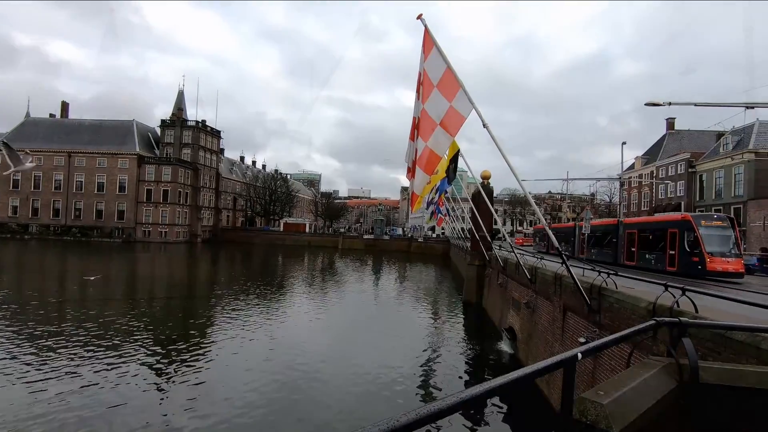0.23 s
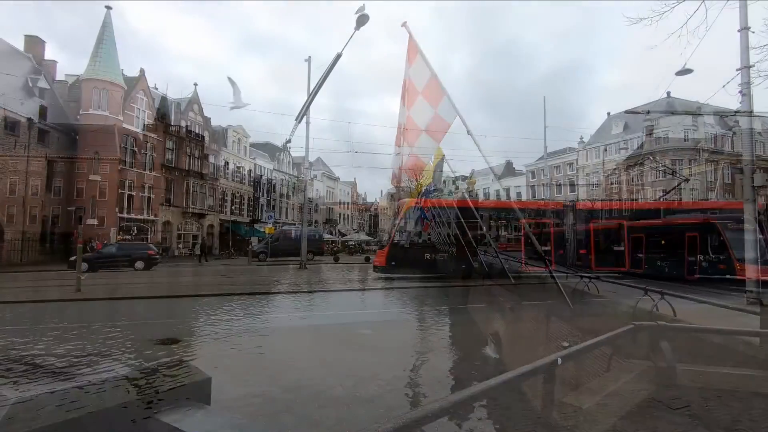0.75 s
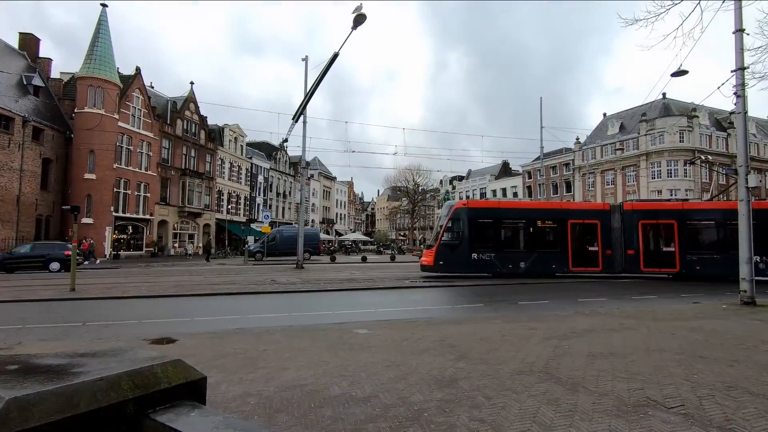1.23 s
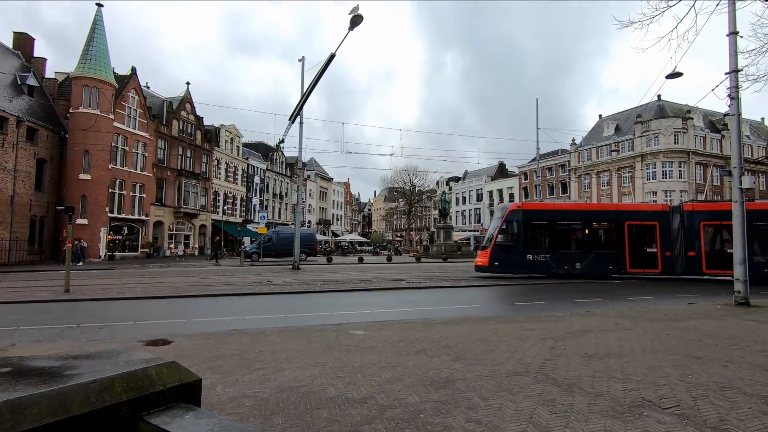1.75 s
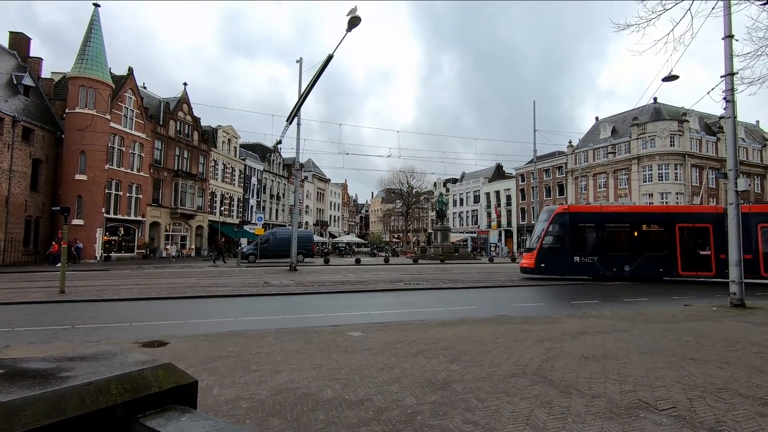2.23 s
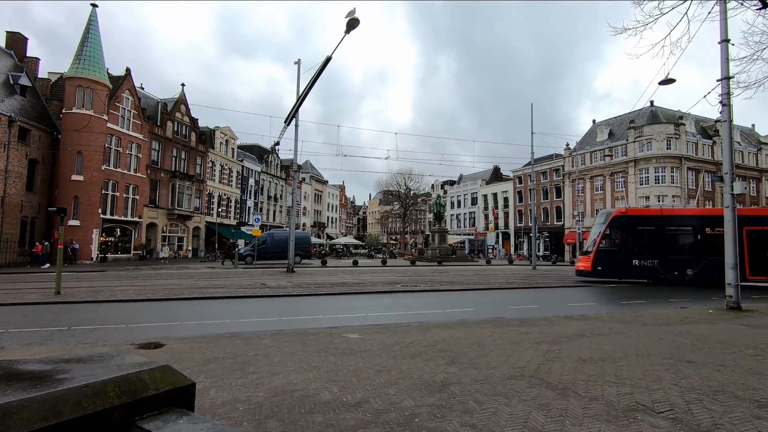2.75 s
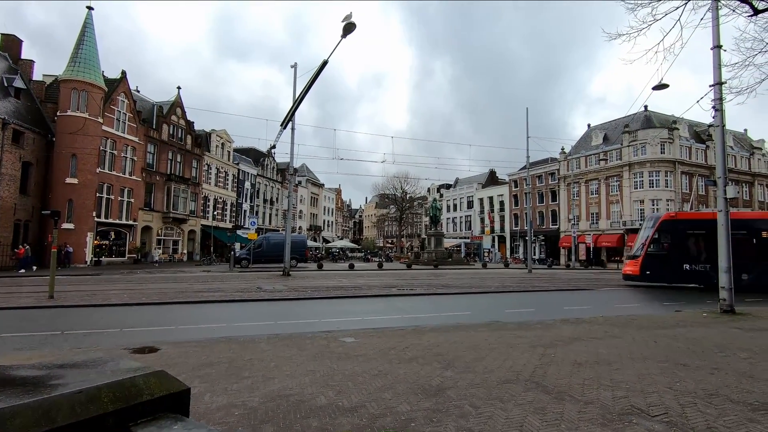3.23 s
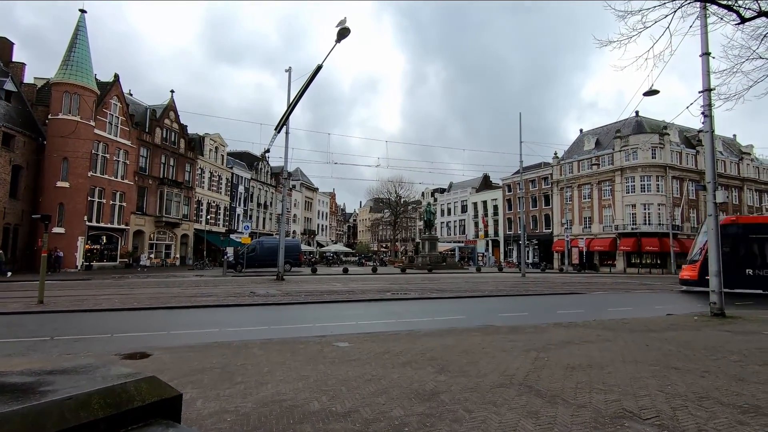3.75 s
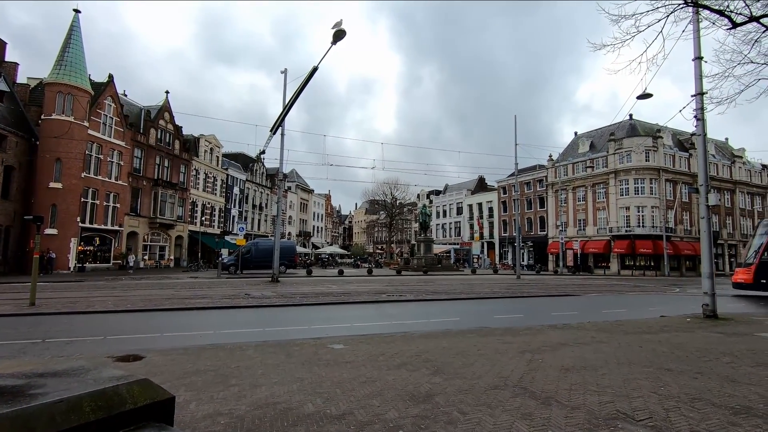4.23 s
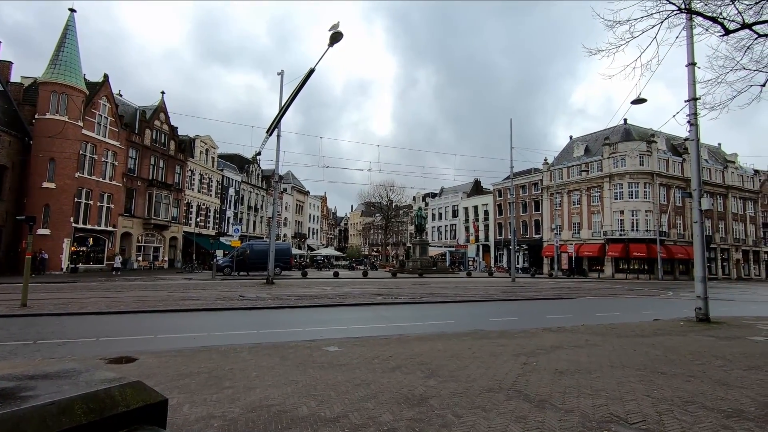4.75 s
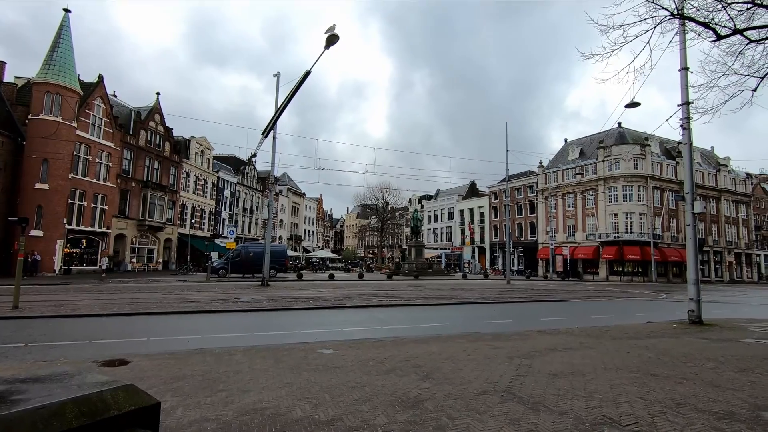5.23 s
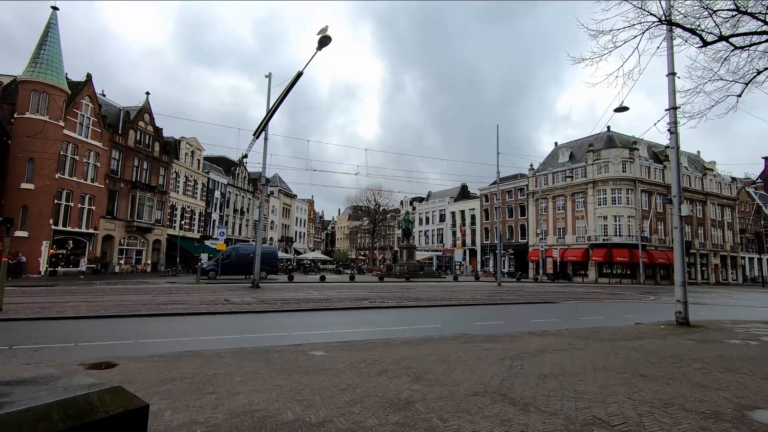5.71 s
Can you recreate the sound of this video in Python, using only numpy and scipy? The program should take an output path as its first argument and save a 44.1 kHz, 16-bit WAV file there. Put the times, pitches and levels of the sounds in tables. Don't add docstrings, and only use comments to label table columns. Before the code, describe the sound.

For the first half second, a distant traffic and tram murmur lies across a pond, bass in the centre and soft hiss spread wide, with a faint thin whine leaning right and a tiny chirp. From 0.5 to 1.2 s it dissolves into a windy square. Low gusts thump the microphone, strongest around 1.3, 1.6 and 2.9 s, over a tram's deep ground rumble, rough wheel roar and mid-pitched metal ringing. Light scrapes come at 0.7 to 1.0 s, then short squeals from 1.0 to 1.6 s. A faint, fluttering motor whine holds one pitch. Small knocks occur near 0.8, 2.7, 3.0 and 3.9 s; wheel edges rub at 2.1, 3.3, 5.0, most clearly 5.35, and 5.8 s. The rolling gradually weakens after 3.5 s, though jolts and rumble persist with thin traffic hiss. Nearly mono sound opens out between 3.4 and 4.8 s.

```python
import sys
import numpy as np
from scipy import signal
from scipy.fft import rfft, irfft, next_fast_len
from scipy.io import wavfile
from scipy.ndimage import uniform_filter1d

SR = 44100
rng = np.random.default_rng(int(sys.argv[2]) if len(sys.argv) > 2 else 0)


def undo_db(level):
    steps = np.asarray(level, float) / 20
    return 10 ** steps


def to_wav(sig):
    pcm = np.clip(np.atleast_2d(sig), -1, 1) * 32767
    pcm = np.round(pcm).astype(np.int16)
    wavfile.write(sys.argv[1], SR, pcm.T)


N = 263718
T = np.arange(N) / SR

# start_s, level_db
NEARNESS = [(.5, -7.5), (.75, -3.5), (1.0, -2), (1.3, 1), (1.75, -0.5), (2.1, -1.5), (2.4, -1.5),
            (2.9, -0.5), (3.15, -.5), (3.5, 1), (3.85, -3.5), (4.15, -0.5), (4.5, -4), (4.8, -2),
            (5.25, -4.5), (5.55, -6.5), (5.98, -7)]
# start_s, jolt_db, length_s
JOLTS = [(1.02, 7, 0.09), (1.17, 2, 0.034), (1.86, 5.5, 0.03), (2.11, 5, 0.08), (2.28, 0, .04),
         (2.55, 4, 0.088), (2.73, 2, 0.017), (2.94, 2.5, .07), (3.29, 3.5, 0.098), (3.74, 2.5, 0.065),
         (4.12, -0.5, 0.056), (4.77, 2, .1), (5.02, 5, .03), (5.35, 5.5, .03), (5.87, 6, 0.15)]
# pitch_hz, level_db (per Hz)
WHEEL_TONE = [(130, -20), (225, -11.5), (258, -5.5), (302, 1.5), (371, 0.5), (504, -8.5), (864, -9),
              (1000, -23.5), (1080, -18.5), (1400, -47.5), (2380, -120)]
# pitch_hz, level_db (per Hz)
RING_TONE = [(560, -24), (950, 1), (1010, -5.5), (1080, -3), (1260, -3.5), (1360, -7.5), (1530, -7),
             (1640, -9), (1740, -3), (1780, -9.5), (1980, -5.5), (2170, -22), (2250, -18.5), (2920, -43.5),
             (4950, -120)]
# pitch_hz, width_hz, level_db (over the ring)
RIMS = [
    (1927, 70, -11.5),
    (2060, 90, -10),
]
# pitch_hz, level_db (per Hz)
GROUND_TONE = [(32, -37), (55, -5.5), (75, -3), (100, 0), (143, 1.5), (158, -6), (178, -3.5), (200, -10.5),
               (240, -14), (260, -23), (340, -40.5), (570, -120)]
# start_s, level_db
WHINE_LOAD = [(.8, -63.5), (.95, -63), (1.18, -46), (1.4, -55), (1.5, -46), (1.81, -70), (2.44, -51.5),
              (2.6, -62), (3.04, -52), (3.17, -62), (3.25, -49), (3.8, -64.5), (4.399, -58.5), (4.9, -62),
              (5.2, -53), (5.39, -57), (5.65, -52), (5.98, -61)]
# start_s, pitch_hz, level_db, octave_db
FAR_WHINE = [(0, 1767, -54, -68), (.03, 1755, -43.5, -67), (.07, 1720, -44, -66), (.095, 1736, -58, -68),
             (.24, 1703, -55, -55), (.29, 1728, -48, -63), (.36, 1716, -60, -59), (.53, 1728, -56, -63),
             (.7, 1710, -69, -70)]
# start_s, level_db, pitch_hz, width_hz, fall_s
KNOCKS = [
    (.823, -37.5, 805, 500, 0.017),
    (2.683, -43, 2660, 500, 0.0063),
    (2.684, -45.5, 4970, 3970, 0.0092),
    (2.69, -46, 3400, 600, 0.0087),
    (3.043, -38, 890, 515, .022),
    (3.92, -40.5, 800, 500, 0.014),
]
# start_s, level_db, pitch_hz, width_hz, fall_s
SQUEALS = [
    (.075, -43, 1040, 50, .021),
    (.901, -57.5, 5960, 300, .025),
    (1.0, -42.5, 2060, 60, .025),
    (1.11, -39.5, 2100, 60, .05),
    (1.12, -48.5, 3150, 400, .04),
    (1.28, -39, 2060, 111, .025),
    (1.41, -43.5, 2110, 60, .019),
    (1.535, -40.5, 2054, 50, .03),
    (1.59, -55, 3020, 200, .02),
    (4.2, -50, 2100, 59.6, .04),
]
# start_s, level_db, pitch_hz, width_hz, fall_s
SCRAPES = [
    (.73, -53, 1350, 300, .027),
    (.77, -41, 1310, 497, .013),
    (.796, -43, 1400, 300, .013),
    (.88, -57, 1500, 300, .017),
    (1.02, -45.5, 1320, 303, .039),
]
# start_s, level_db, pitch_hz, width_hz, fall_s
RUBS = [
    (2.071, -45.5, 1500, 1490, 0.027),
    (3.279, -45, 1650, 303, .07),
    (5.018, -46.5, 1510, 1500, 0.034),
    (5.345, -37.5, 1170, 280, 0.031),
    (5.36, -49, 2000, 300, 0.051),
    (5.8, -48.5, 2020, 2520, 0.11),
]
# pitch_hz, level_db (per Hz)
WIND_TONE = [(8.8, -32.5), (15, -11), (37, 1), (75, -6), (98, -25.5), (160, -120)]
# start_s (middle), swell_db, length_s
GUSTS = [(.98, 6.2, 0.11), (1.3, 10, 0.089), (1.6, 8, 0.065), (1.95, 3.8, 0.11), (2.3, 5, 0.32),
         (2.86, 11, 0.055), (3.25, 4.6, 0.11), (3.46, 7.9, 0.025), (3.79, 6.6, 0.064), (4.3, 2.8, .2),
         (5.14, 7.2, 0.054), (5.85, 5.4, 0.13)]
# pitch_hz, level_db (per Hz)
HISS_TONE = [(1900, -29), (2150, -13.5), (3430, -17), (3840, -21.5), (5000, -23.5), (6500, -29),
             (8500, -33.5), (11200, -53)]
# start_s, level_db
STREET = [(.5, -0.5), (1.0, -1), (1.6, 1), (2.4, 0), (3.3, 1), (3.9, -2), (4.9, -1), (5.4, -0.5),
          (5.98, -1)]
# start_s, share (0-1)
OPENING = [(0, 0.09), (3.35, 0.06), (3.75, 0.33), (4.25, .62), (4.75, .95), (6, 1.01)]
# pitch_hz, level_db
SIDE_LEVEL = [(60, -22.5), (200, -23), (400, -13.5), (600, -7), (850, -1.5), (1500, -1.7), (4000, 0),
              (11000, 0.5)]
# pitch_hz, share (0-1)
LEAN = [(100, .85), (1200, 0.76), (3000, 0.5), (5000, .3), (11000, .1)]
# pitch_hz, level_db (per Hz)
POND_TONE = [(12, -56.5), (20, -15.5), (87, 7.5), (102, 6.5), (152, -7), (497, -17), (630, -15), (799, -19),
             (1040, -17.5), (1630, -20.5), (1760, -21), (2060, -22.5), (3490, -26), (3880, -30),
             (10800, -48), (14100, -76), (22000, -120)]
# pitch_hz, level_db
POND_SIDE = [(60, -28), (110, -15.5), (190, -20.5), (330, -15), (590, -8), (1050, -3), (1860, -2.5),
             (3310, -6), (5860, 1.5), (10400, 1)]
# start_s, pond_db, square_db
DISSOLVE = [
    (0, 0, -48),
    (.48, -2, -46),
    (.5, -3, -1.5),
    (.6, -6, -2),
    (.8, -7, -1.5),
    (1.05, -8, -2.5),
    (1.2, -32.5, 0.5),
    (6, -56, 0.5),
]


def on_log(hz, table):
    table_hz, values = np.transpose(table)
    return np.interp(np.log(hz + 1e-9), np.log(table_hz), values)


def curves(table):
    s, *columns = np.transpose(table)
    return [np.interp(T, s, column) for column in columns]


def swells(table):
    return sum(db * np.exp(-((T - s) / length_s) ** 2) for s, db, length_s in table)


def unit(x):
    return x / np.sqrt(np.mean(x ** 2))


def shape(x, response):
    size = next_fast_len(len(x))
    return irfft(rfft(x, size) * response(np.fft.rfftfreq(size, 1 / SR)), size)[:len(x)]


def resonance(length, hz, width_hz):
    return unit(shape(rng.standard_normal(length), lambda f: 1 / (1 + (2 * (f - hz) / width_hz) ** 2)))


def walk(rate):
    hold = int(SR / rate)
    steps = np.repeat(rng.standard_normal(N // hold + 1), hold)
    smooth = uniform_filter1d(uniform_filter1d(steps, hold), hold)
    return unit(smooth[:N])


def roar(tone, flicker_db, shared_db, rate):
    size = next_fast_len(N)
    f = np.fft.rfftfreq(size, 1 / SR) + 1e-9
    noise = rfft(rng.standard_normal(size)) * undo_db(on_log(f, tone))
    lurch_db = shared_db * walk(rate)
    out = 0
    for octave in np.arange(np.log2(tone[0][0]), np.log2(min(tone[-1][0], 14000)), .5):
        band = irfft(noise * np.clip(1 - 2 * abs(np.log2(f) - octave), 0, 1), size)[:N]
        out = out + band * undo_db(lurch_db + flicker_db * walk(rate))
    return unit(out)


def tram_db(level_db, near_share, jolt_share):
    return level_db + near_share * curves(NEARNESS)[0] + jolt_share * swells(JOLTS)


def wheel_roar():
    return undo_db(tram_db(-29, 1.09, 0.63)) * roar(WHEEL_TONE, 0.54, 1.0, 9.)


def ring_db():
    return tram_db(-43, 0.84, 0.68)


def metal_ring():
    return undo_db(ring_db()) * roar(RING_TONE, 0.97, 1.0, 12.)


def singing_rims():
    strands = 0
    for hz, width_hz, db in RIMS:
        strands = strands + undo_db(db + 3.1 * walk(7.)) * resonance(N, hz, width_hz)
    fade_db_per_s = -1.36
    return undo_db(ring_db() + fade_db_per_s * T) * strands


def ground_rumble():
    return undo_db(tram_db(-20.5, 1, 0.59)) * roar(GROUND_TONE, 0.36, 0.11, 6.)


def whine(table, wobble_hz, flutter_db):
    hz, db, octave_db = curves(table)
    phase = 2 * np.pi * np.cumsum(hz + wobble_hz * walk(25.)) / SR
    low = undo_db(db + 1.4 * flutter_db * walk(14.)) * np.sin(phase)
    octave = undo_db(octave_db + 2.1 * flutter_db * walk(9.)) * np.sin(2 * phase)
    start_s, end_s = table[0][0], table[-1][0]
    gate = (T > start_s) * np.clip((end_s - T) / 0.0081, 0, 1)
    return np.sqrt(2) * (low + octave) * gate


def near_whine():
    table = []
    for s, db in WHINE_LOAD:
        octave_db = -61.5 - 2.5 * abs(s - 2.2)
        table.append((s, 1687.5, db, octave_db))
    return whine(table, wobble_hz=4.5, flutter_db=1.8)


def bursts(table, rise_share, aside):
    out = np.zeros(N)
    for s, db, hz, width_hz, fall_s in table:
        ring = resonance(N // 16, hz, width_hz)
        start = max(int((s - .1) * SR), 0)
        t = T[start:start + len(ring)] - s
        swell = np.exp(-np.where(t < 0, (t / (rise_share * fall_s)) ** 2, t / fall_s))
        burst = unit(ring[:len(t)] * swell) * np.sqrt(np.mean(swell ** 2))
        out[start:start + len(t)] += undo_db(db) * burst
    return np.array([out * np.sqrt(1 - aside ** 2), out * aside])


def rail_contacts():
    return (bursts(KNOCKS, rise_share=.25, aside=.02) + bursts(SQUEALS, rise_share=.45, aside=.03)
            + bursts(SCRAPES, rise_share=.65, aside=-.95) + bursts(RUBS, rise_share=.6, aside=-.14))


def wind():
    level_db = -28.5 - 0.37 * T + swells(GUSTS)
    return undo_db(level_db) * roar(WIND_TONE, 0.2, 0.2, 3.6)


def street_hiss():
    return undo_db(tram_db(-51.5, 0.11, .6) + curves(STREET)[0]) * roar(HISS_TONE, 0.32, 0.49, 12.)


def square():
    near = wheel_roar() + metal_ring() + street_hiss()
    diffuse = wheel_roar() + metal_ring() + street_hiss()
    return wind() + ground_rumble() + near + singing_rims(), diffuse


def square_side(mid, diffuse):
    def share(f):
        return np.clip(on_log(f, LEAN), 0, 1)

    def leaning(f):
        quarter_turn = np.exp(.5j * np.pi / (1 + (f / 640.0) ** 2.5))
        return -undo_db(on_log(f, SIDE_LEVEL)) * share(f) * quarter_turn

    def spread(f):
        return undo_db(on_log(f, SIDE_LEVEL)) * np.sqrt(1 - share(f) ** 2)

    wide = shape(mid, leaning) + shape(diffuse, spread)
    tilt = shape(mid, lambda f: -undo_db(-27.0) / (1 + (560.0 / (f + 1)) ** 3))
    return curves(OPENING)[0] * wide + tilt


def pond():
    mid = roar(POND_TONE, 0.76, 0.11, 36.0)
    side = shape(roar(POND_TONE, 0.4, 0.2, 9.), lambda f: undo_db(on_log(f, POND_SIDE)))
    return undo_db(-29.5) * mid, undo_db(-29.5) * side


def scene():
    pond_gain, square_gain = (undo_db(db) for db in curves(DISSOLVE))
    contact, contact_side = rail_contacts()
    near, diffuse = square()
    drive = near_whine()
    near = square_gain * near + drive + contact
    far, far_side = pond()
    far_drive = whine(FAR_WHINE, wobble_hz=4., flutter_db=1.)
    mid = near + pond_gain * far + far_drive
    side = square_side(near, square_gain * diffuse) + pond_gain * far_side + contact_side
    side = side - 0.41 * far_drive - .3 * curves(OPENING)[0] * drive
    return np.array([mid + side, mid - side])


def silence_faint_bands(mid, side):
    edge_hz, follow, luck_db, patch_db = 5800., 1.5, 3.5, 1.8
    side_db, masked_db, sparse_db = -14., -28., 1.
    window = np.sin(np.pi * (np.arange(2048) + .5) / 2048)
    f, _, m = signal.stft(mid, SR, window, nperseg=2048)
    _, _, s = signal.stft(side, SR, window, nperseg=2048)
    frames = m.shape[1]

    def band_power(z):
        power = (abs(z[:1024]) ** 2).reshape(64, 16, -1).mean(axis=1)
        return np.repeat(power, 16, axis=0) + 1e-18

    mid_band, side_band = band_power(m), band_power(s)
    loud_db = uniform_filter1d(10 * np.log10(mid_band.sum(axis=0)), size=35)
    spare = rng.exponential(size=(frames, 2)).T
    patch = undo_db(2 * patch_db * np.repeat(rng.standard_normal((frames, 64)).T, 16, axis=0))
    usual = np.median(mid_band[np.argmin(abs(f - edge_hz))])
    floor = usual * undo_db(2 * follow * (loud_db - np.median(loud_db))) * patch
    mid_floor = floor * undo_db(-2 * luck_db * spare[0])
    covered = mid_band * patch * undo_db(2 * masked_db)
    side_floor = np.maximum(floor * undo_db(2 * side_db), covered) * undo_db(2 * luck_db * (1 - spare[1]))
    out = []
    for z, band, least in ((m, mid_band, mid_floor), (s, side_band, side_floor)):
        heard = (band > least / 2) * (mid_band > mid_floor / 4)
        strong = abs(z[:1024]) ** 2 > least * undo_db(2 * sparse_db)
        kept = np.vstack([z[:1024] * heard * strong, 0 * z[-1:]])
        out.append(signal.istft(kept, SR, window, nperseg=2048)[1][:N])
    return out


def roll_off(x):
    return signal.sosfilt(signal.butter(12, 10990, fs=SR, output="sos"), x)


def record(dry):
    left, right = np.tanh(1.3 * dry) / 1.3
    mid, side = silence_faint_bands((left + right) / 2, (left - right) / 2)
    fade = np.clip(np.minimum(T, T[-1] - T) / .004, 0, 1)
    return roll_off(fade * np.array([mid + side, mid - side]))


dry = scene()
out = record(dry)
to_wav(out)
```